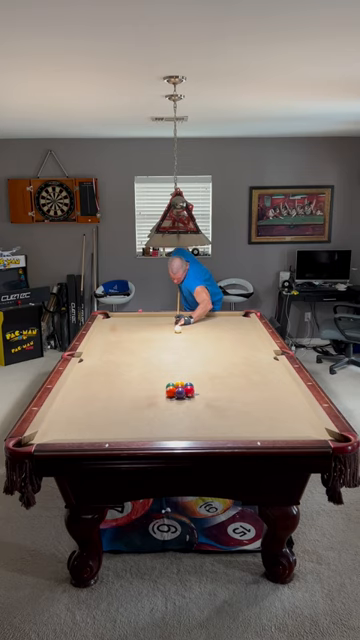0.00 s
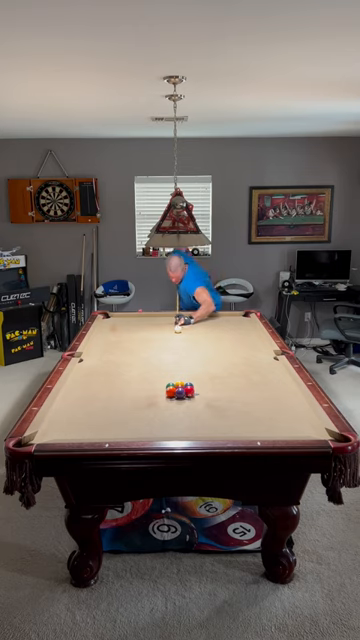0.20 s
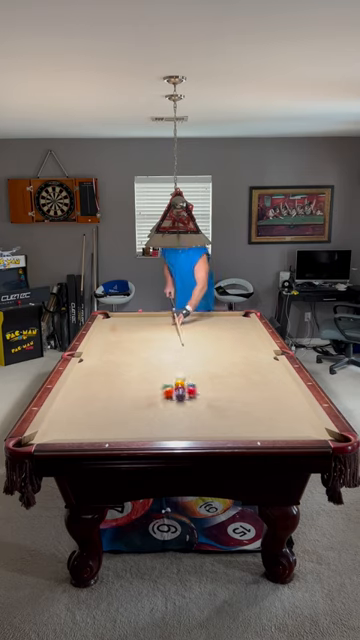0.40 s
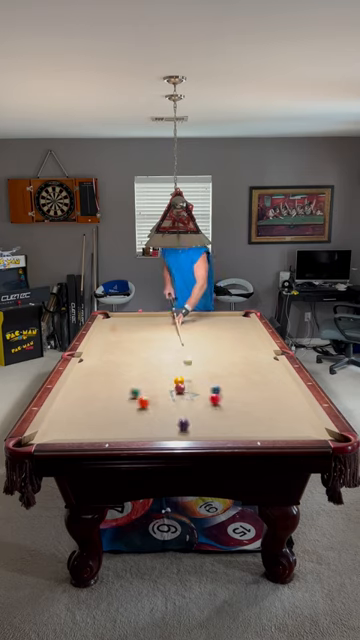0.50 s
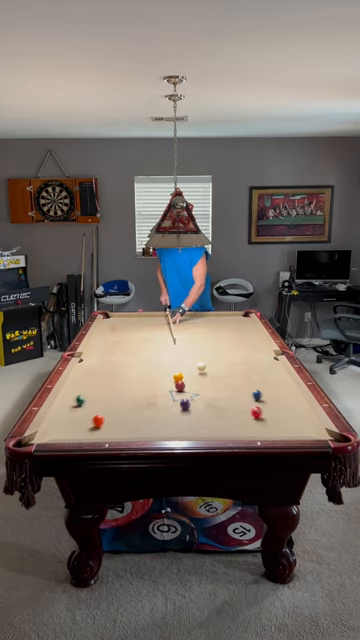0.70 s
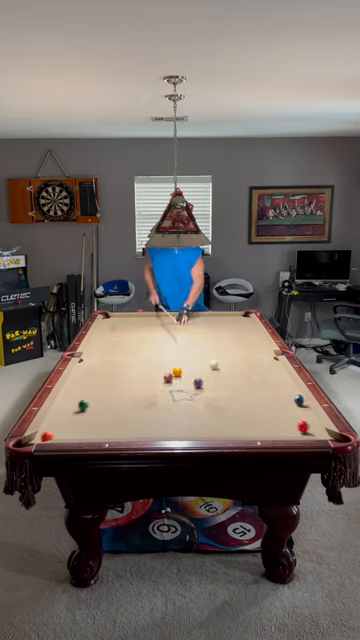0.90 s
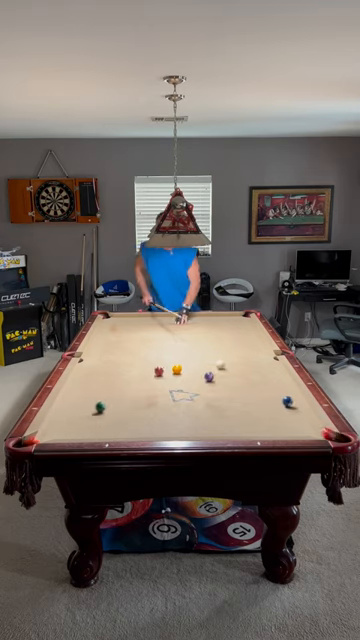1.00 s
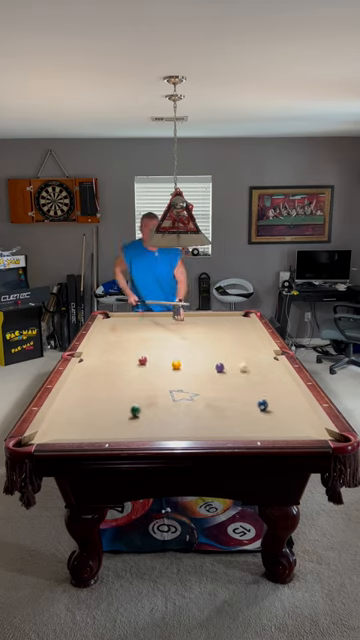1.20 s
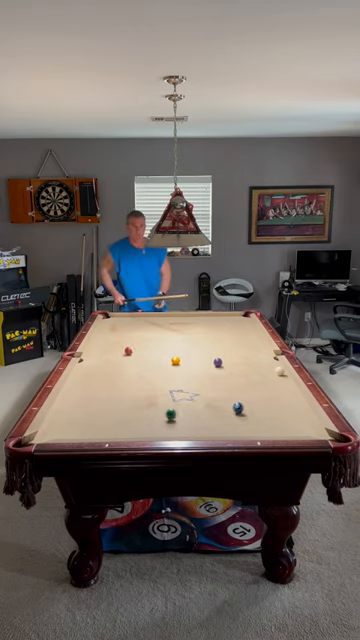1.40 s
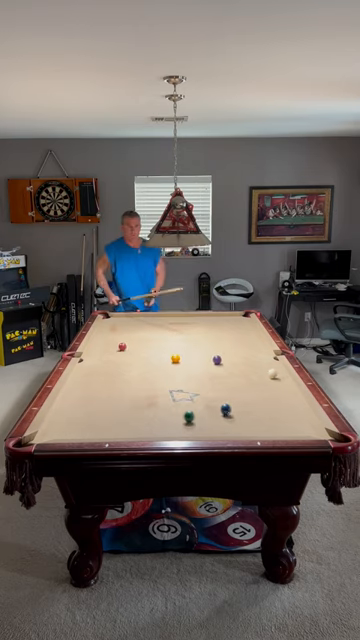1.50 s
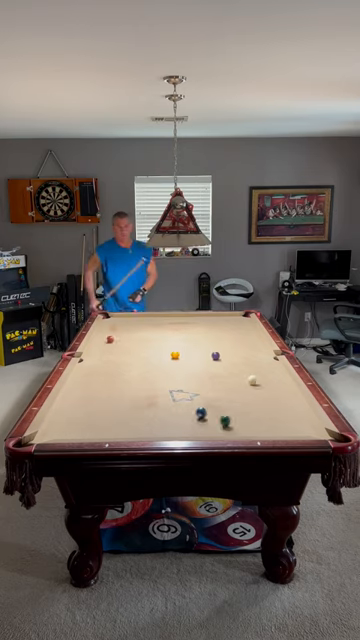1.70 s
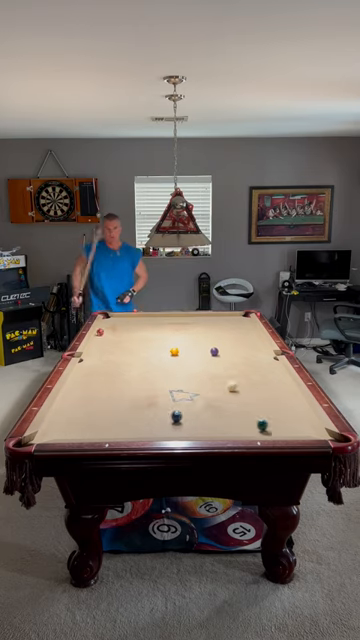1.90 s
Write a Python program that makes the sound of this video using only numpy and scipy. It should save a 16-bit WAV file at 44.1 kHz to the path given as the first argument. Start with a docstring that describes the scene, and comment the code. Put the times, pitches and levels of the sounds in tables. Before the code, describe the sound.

After a brief quiet hush, a cue ball smashes a tight rack; hard balls clack and knock the wooden cushions in two clusters, then slow to light clicks, with short bright room echo around a distant stereo microphone.

```python
"""A sharp crack, then clicks, wooden knocks and a low rumble: a break shot on a pool table in a small, live room.
The crack is a flurry of filtered impulses, coloured by a few sines; clicks are pitched pulses plus noise bursts;
knocks are filtered impulses spread through wood, plus table and slate modes; rolling and hush are shaped noise.
Blows pass through reflections, a scattered ceiling echo and a noise tail; a limiter ducks the hardest ones."""
import sys
import numpy as np
from scipy import signal
from scipy.fft import rfft, irfft
from scipy.io import wavfile
from scipy.ndimage import uniform_filter1d, minimum_filter1d

SR = 44100
rng = np.random.default_rng(int(sys.argv[2]) if len(sys.argv) > 2 else 0)


def pcm_store(signal):
    """Save signal as 16-bit PCM."""
    levels = np.round(np.clip(np.atleast_2d(signal), -1, 1) * 32767)
    wavfile.write(sys.argv[1], SR, levels.astype(np.int16).T)


N = 88200
T = np.arange(SR) / SR  # one second after a blow [s]
IMPULSE = signal.unit_impulse(SR)
CEILING_DB = -5.5  # ceiling echo of the break and the knocks
# room tail and stereo likeness: (frequency [Hz], t60 [s], left-right likeness [-1..1])
ROOM_BANDS = [(60, 0.34, 0.96), (200, 0.81, 0.81), (450, 0.36, 0.63), (940, 0.62, 0), (1900, 0.6, 0.036),
              (3470, 0.61, 0.018), (6000, 0.54, 0.17), (12600, 0.31, 0.068)]


def from_db(db):
    """Decibels to gain."""
    return 10 ** (np.asarray(db) / 20)


def unit(x):
    """Scale to energy 1, averaged over the channels."""
    return x / np.sqrt(np.mean(np.sum(x ** 2, axis=-1)) + 1e-20)


def dying(t60_s):
    """Exponential decay, 60 dB down after t60."""
    return np.exp(-np.log(1000) * T / t60_s)


def building(time_constant_s):
    """Exponential approach to 1."""
    return 1 - np.exp(-T / time_constant_s)


def sides(db):
    """Stereo gains: left up by db, right down by db."""
    return from_db([[db], [-db]])


def add(out, start_s, x):
    """Mix x into out from start_s on."""
    start = int(start_s * SR)
    out[:, start:start + x.shape[-1]] += x[..., :N - start]


def coloured(x, points):
    """Causal minimum-phase filter through (frequency [Hz], level [dB]) points, by folding the cepstrum."""
    size = 2 * x.shape[-1]
    hz, db = np.transpose(points)
    grid_hz = np.maximum(np.fft.rfftfreq(size, 1 / SR), 1)
    gain_db = np.interp(np.log(grid_hz), np.log(hz), db)
    cepstrum = irfft(np.log(from_db(gain_db)))
    cepstrum[1:size // 2] *= 2
    cepstrum[size // 2 + 1:] = 0
    response = np.exp(rfft(cepstrum))
    return irfft(rfft(x, size) * response)[..., :size // 2]


def filtered(x, order, hz, kind):
    """Butterworth filter."""
    return signal.sosfilt(signal.butter(order, hz, kind, fs=SR, output="sos"), x)


def rack():
    """The cue ball's blow passes from ball to ball in a few hundredths of a second; room tones follow."""
    break_s, break_db, room_db = .2186, 2.5, 7
    contacts, spread_s, rise_db = 8, .026, 2
    tones_total_db, tones_t60_s = 10, .4
    # colour of the crack: (frequency [Hz], level [dB])
    crack_colour = [(30, -33.5), (100, -18), (250, 6), (500, 11), (900, 4), (1500, 4), (2600, 0),
                    (4200, -7), (5800, -7.5), (8000, -14), (12500, -18), (16000, -26)]
    # room colouring after the crack, a few sustained tones: (frequency [Hz], relative level [dB])
    room_tones = [(1540, -40.5), (2169, -57.5), (2546, -34.5), (2859, -40), (3230, -49.5), (4059, -50),
                  (5609, -44.5), (5722, -53), (5949, -51), (6638, -53.5)]

    out = np.zeros((2, N))
    crack = unit(coloured(IMPULSE, crack_colour))
    for k in range(contacts):
        jitter = rng.uniform(-.5, .5) * (k > 0)
        progress = (k + jitter) / contacts
        gain = from_db(break_db + rise_db * progress) * rng.choice([-1, 1])
        contact = through(crack, room_paths(room_db, CEILING_DB, 0))
        add(out, break_s + progress * spread_s, gain * contact)

    tones = 0
    for hz, db in room_tones:
        phase_cycles = rng.random((2, 1))
        tones = tones + from_db(db) * np.sin(2 * np.pi * (hz * T + phase_cycles))
    onset = np.minimum(T / spread_s, 1)
    add(out, break_s, from_db(tones_total_db) * unit(tones * onset * dying(tones_t60_s)))
    return out


def burst(hz, width_hz, t60_s):
    """A cluster of close resonances: band-passed noise that dies away."""
    edges_hz = np.clip([hz - width_hz / 2, hz + width_hz / 2], 20, SR / 2 - 20)
    return unit(filtered(rng.standard_normal(SR), 2, edges_hz, "band") * dying(t60_s))


def ball_clicks():
    """Two hard balls meet: a short pitched pulse, with a brief high ring and a snap on top."""
    ring_t60_s, skirt_db = 0.014, -3.5
    snap_width_hz, snap_t60_s = 3200, 0.0067
    # clicks: (time [s], level [dB], pitch [Hz], ring [dB], snap [dB], snap centre [Hz],
    #          room [dB], ceiling echo [dB], left over right [dB])
    clicks = [(0.4039, 15, 2040, -33.5, -30, 14300, -2, -3.5, 0.5),
              (0.8227, 5.5, 2083, -37, -20, 15100, -2, -5, 0.5),
              (1.077, -40.5, 3680, -7, -3, 13000, 6, -14, 7),
              (1.1493, -2, 2120, -31, -27, 14000, 0.5, 1, -0.5),
              (1.1700, -5.5, 2720, -6, -26, 13000, 6.5, -4, 2),
              (1.3044, -6, 1970, -5.5, -6.5, 12900, 4, -7.5, 0.5),
              (1.3930, -10, 3280, -2, -19, 12000, 3.5, -2, 2),
              (1.5266, -16, 2970, -8.5, -18, 13500, 4.5, -8, 1.5),
              (1.736, -41, 3630, 2.5, -21, 12950, 6.5, -11.5, 7.5),
              (1.784, -52, 3600, -2, -12.5, 13000, 16, -4, -1),
              (1.817, -47, 1545, -23.5, -1, 12900, 8.5, -5.5, -1.5),
              (1.893, -43.5, 3800, -3, -14, 13000, 4.5, -1.5, 6.5)]
    # colour of a click: (multiple of its pitch, level [dB])
    click_colour = [(.03, -53), (.2, -16.5), (.5, -9.5), (.8, -1), (1.12, 1.5), (1.45, -6.5), (2, -18),
                    (3, -54.5), (6, -47.5)]

    out = np.zeros((2, N))
    for start_s, db, pitch_hz, ring_db, snap_db, snap_hz, room_db, ceiling_db, left_db in clicks:
        colour = [(multiple * pitch_hz, level_db) for multiple, level_db in click_colour]
        pulse = unit(coloured(IMPULSE, colour))
        ring = burst(5950, 1100, ring_t60_s)
        ring += from_db(skirt_db) * burst(6570, 5800, ring_t60_s)
        snap = burst(snap_hz, snap_width_hz, snap_t60_s)
        click = pulse + from_db(ring_db) * unit(ring) + from_db(snap_db) * snap
        heard = through(click, room_paths(room_db, ceiling_db, 0))
        add(out, start_s, from_db(db) * sides(left_db / 2) * heard)
    return out


def ringing(modes):
    """Struck modes as decaying sines, each a little stronger or weaker on every blow."""
    total = 0
    for k, (hz, db, t60_s) in enumerate(modes):
        gain = (-1) ** k * from_db(db + rng.normal(0, 4.5))
        total = total + gain * np.sin(2 * np.pi * hz * T) * dying(t60_s)
    return unit(total)


def rail_knocks():
    """A ball hits a cushion or pocket, or the break thumps the table: a soft push spreads through the wooden
    rails, table and slate ring."""
    hardness, direct_db = 0.0092, -9  # hardness: share of unsoftened push
    wood_db, wood_t60_s, wood_build_s = 0.5, .06, 0.001
    body_lean_db, body_build_s = 1.67, 0.001
    # knocks: (time [s], level [dB], low edge [Hz], brightness corner [Hz], table modes [dB],
    #          slate thud [dB], room [dB])
    knocks = [(.2183, 15, 328, 1000, -1, -6.5, 0.5), (.3590, 12, 620, 1240, -9.5, -17, -3.5),
              (.3795, 10.5, 400, 1000, -1.5, -43, -19), (.394, 2, 248, 820, -12, -6, -24),
              (.531, -7, 303, 726.4, -3, -9, 1), (.57, -5.5, 250, 2000, -3, -6, 4),
              (.603, -4, 250, 1100, -2.5, -7.5, 7), (.630, -10.5, 150, 1800, -2, 2, 15.5),
              (.6905, 14, 620, 2080, -7.5, -9.5, 0.5), (.7115, 12, 277, 2200, -9.5, -10, -1.5),
              (.768, -4, 295, 1970, -6.5, 0, -12), (.8445, 10, 556, 1130, -16, -36.5, -2),
              (.864, 7, 400, 1110, -10.5, -5, -1.5), (.925, 2, 445, 890, -2.5, -13, 1.5),
              (.946, -4, 450, 940, -5.5, -16, -1), (.982, 2.5, 290, 635, -6, -13, 0),
              (1.41, -19, 400, 900, -13, -5, -1.5), (1.456, -10, 322, 802, -21, -9, -5.5),
              (1.48, -15.5, 220, 650, -1.5, -4, 2.5)]
    # colour of the wooden rails: (frequency [Hz], level [dB])
    wood_colour = [(30, -31.5), (200, -4), (350, -0.5), (650, 1.5), (1000, 0), (1600, -1), (2500, -3.5),
                   (4000, -6), (8000, -13.5), (15000, -15.5)]
    # table resonances: (frequency [Hz], relative level [dB], t60 [s])
    table_modes = [(254, -3, 0.26), (306.2, 5, 0.25), (333.2, 4.5, 0.23), (402, -3, 0.16),
                   (487, -2.5, 0.059), (568.3, -1, 0.077), (709, 5.5, 0.091), (819, 6, .2), (870, -1, .18),
                   (1090, -12.5, .15), (1167, -3, 0.22), (1313, -5.5, 0.05)]
    # slate resonances: (frequency [Hz], relative level [dB], t60 [s])
    slate_modes = [(67, -18, 0.23), (89.2, -9, 0.37), (132.5, 0.5, 0.3), (168.5, -1.5, 0.48),
                   (218, -2.5, 0.1)]

    out = np.zeros((2, N))
    wood = coloured(IMPULSE, wood_colour)
    for start_s, db, low_hz, bright_hz, modes_db, thud_db, room_db in knocks:
        push = filtered(wood, 4, bright_hz, "low") + hardness * wood
        push = unit(filtered(push, 2, low_hz, "high"))
        paths = room_paths(room_db, CEILING_DB, direct_db)
        paths += from_db(wood_db) * scatter(wood_t60_s) * building(wood_build_s)
        body = from_db(modes_db) * ringing(table_modes) + from_db(thud_db) * ringing(slate_modes)
        add(out, start_s, from_db(db) * through(push, paths))
        add(out, start_s, from_db(db) * sides(body_lean_db) * body * building(body_build_s))
    return out


def rolling():
    """The balls rumble over the slate and hiss on the cloth: two shaped noises that swell, then fade."""
    # rumble level: (time [s], level [dB])
    rumble_level = [(0, -92), (.2, -53), (.26, -41.5), (0.601, -37.5), (.9, -42.5), (1.15, -42),
                    (1.4, -49.5), (1.701, -51), (2, -54)]
    # rumble colour: (frequency [Hz], level [dB])
    rumble_colour = [(20, -39.5), (35, -24), (55, -16), (82, 4.5), (105, -8), (140, -0.5), (220, -13),
                     (350, -18), (600, -28), (1500, -28), (5000, -39.5), (16000, -64.5)]
    # cloth hiss level: (time [s], level [dB])
    hiss_level = [(0, -88), (.2, -80), (.3, -66), (.6, -61.5), (1.1, -65), (1.6, -67), (2, -84.5)]
    # cloth hiss colour: (frequency [Hz], level [dB])
    hiss_colour = [(100, -20), (1500, 2.5), (4000, 0), (8000, -2), (13000, 0.5), (16000, -5)]

    time_s = np.arange(N) / SR
    rumble = from_db(np.interp(time_s, *np.transpose(rumble_level))) * steady_noise(rumble_colour)
    hiss = from_db(np.interp(time_s, *np.transpose(hiss_level))) * steady_noise(hiss_colour)
    return rumble + hiss


def room_hush():
    """Steady, mostly low noise of the room."""
    level_db = -53.5
    # colour of the hush: (frequency [Hz], level [dB])
    hush_colour = [(15, -47), (25, -15), (42, -16), (64, -4.5), (82, -16), (166, -18), (200, -23),
                   (242, -24), (439, -41.5), (1100, -42), (9570, -66), (13200, -58.5), (16000, -66)]
    return from_db(level_db) * steady_noise(hush_colour)


def diffuse(size):
    """Spectrum of stereo noise whose left-right likeness varies with frequency, and its log-frequency axis."""
    hz, _, alike = np.transpose(ROOM_BANDS)
    log_hz = np.log(np.maximum(np.fft.rfftfreq(size, 1 / SR), 1))
    alike = np.clip(np.interp(log_hz, np.log(hz), alike), -1, 1)
    mid, side = rfft(rng.standard_normal((2, size)))
    spectrum = np.sqrt(1 + alike) * mid + np.sqrt(1 - alike) * side * [[1], [-1]]
    return spectrum, log_hz


def steady_noise(colour):
    """Coloured diffuse stereo noise of rms 1."""
    return unit(coloured(irfft(diffuse(N)[0]), colour)) * np.sqrt(N)


def scatter(t60_s):
    """A short stereo spray of scattered sound: decaying diffuse noise."""
    return unit(irfft(diffuse(SR)[0]) * dying(t60_s))


def room_paths(room_db, ceiling_db, direct_db):
    """Direct sound and fixed first reflections, with ceiling echo and tail of fresh noise for every blow."""
    build_s, lean_db = 0.001, 0.29
    ceiling_s, ceiling_t60_s = .0208, 0.061
    # first reflections: (delay [s], level re direct [dB], extra delay at right [s])
    reflections = [(.0018, -10.5, .00045), (.0081, -14.5, .0004), (0.0191, -21, .00005)]

    band_hz, band_t60_s, _ = np.transpose(ROOM_BANDS)
    noise, log_hz = diffuse(SR)
    tail = 0
    for band, t60_s in zip(np.eye(len(band_hz)), band_t60_s):
        weight = np.interp(log_hz, np.log(band_hz), band)  # overlapping triangles
        tail = tail + irfft(noise * weight) * dying(t60_s)
    paths = unit(tail * building(build_s)) * from_db(room_db) * sides(lean_db)
    paths += from_db(ceiling_db) * np.roll(scatter(ceiling_t60_s), int(ceiling_s * SR), axis=1)
    paths[:, 0] += from_db(direct_db)
    for delay_s, db, lag_s in reflections:
        paths[0, int(delay_s * SR)] += from_db(direct_db + db)
        paths[1, int((delay_s + lag_s) * SR)] += from_db(direct_db + db)
    return paths


def through(x, paths):
    """Convolve a mono sound with stereo paths."""
    return signal.fftconvolve(x[None], paths, axes=1)


def scene():
    """Break, clicks, knocks and rolling over the hush of the room."""
    return rack() + ball_clicks() + rail_knocks() + rolling() + room_hush()


def record(dry):
    """Microphone colour, look-ahead limiter with linear dB release, and top cut."""
    limit_db, release_db_per_s, look_ahead_s = -0.5, 328.5, 0.0079
    cutoff_hz = 17000  # stopband edge, 60 dB down
    # microphone colour: (frequency [Hz], level [dB])
    microphone = [(18, -16.5), (40, -3), (5000, -2), (8400, -2.5), (9300, -13), (10000, -37.5),
                  (10800, -15.5), (11500, 1), (15500, -8)]

    x = coloured(dry, microphone)
    peak_db = 20 * np.log10(abs(x).max(axis=0) + 1e-9)
    over_db = np.maximum(peak_db - limit_db, 0)
    fall_db = release_db_per_s * np.arange(N) / SR
    held_db = np.maximum.accumulate(over_db + fall_db) - fall_db
    ahead = max(int(look_ahead_s * SR), 1)
    gain_db = uniform_filter1d(minimum_filter1d(-held_db, 2 * ahead), ahead)
    x = x * from_db(gain_db)
    return signal.sosfilt(signal.cheby2(14, 60, cutoff_hz, fs=SR, output="sos"), x)


dry = scene()
out = record(dry)
pcm_store(out)
```